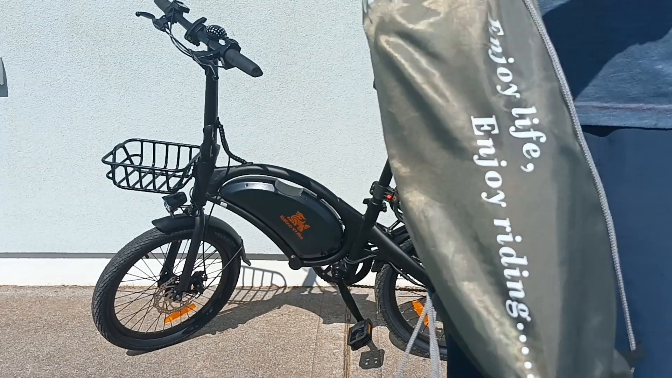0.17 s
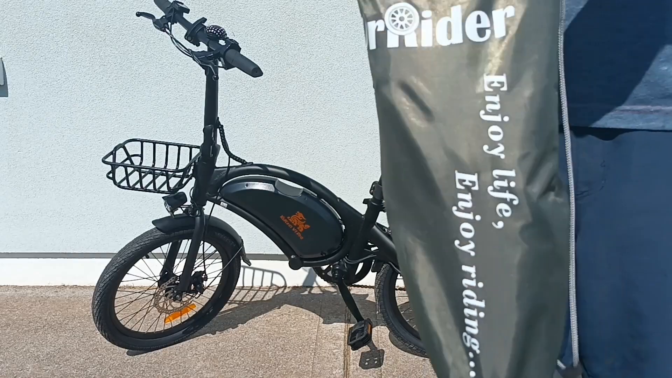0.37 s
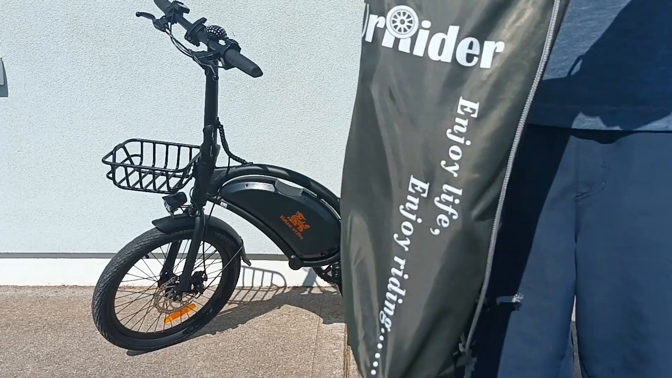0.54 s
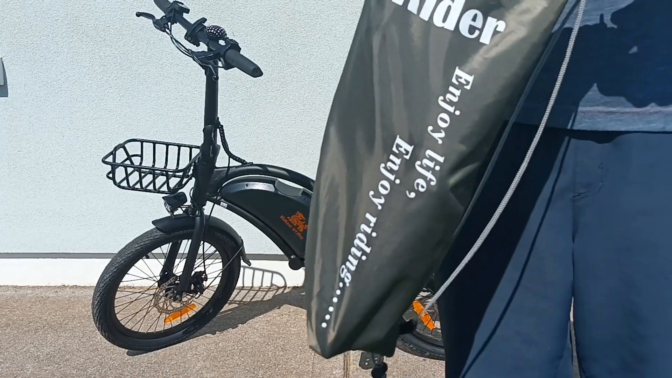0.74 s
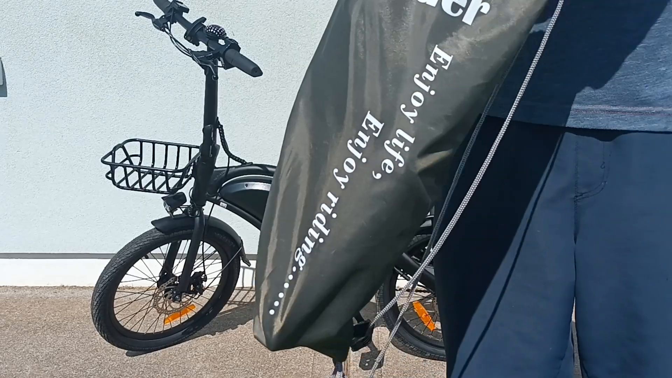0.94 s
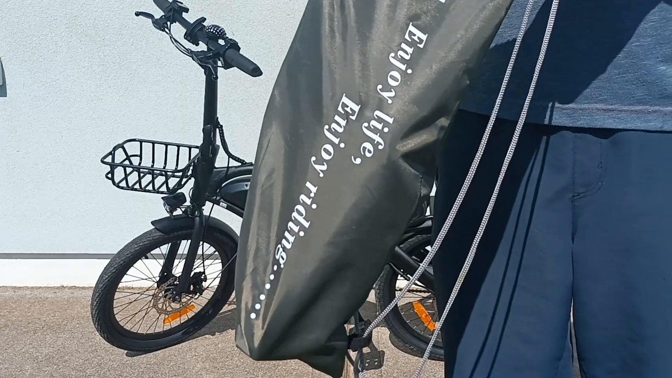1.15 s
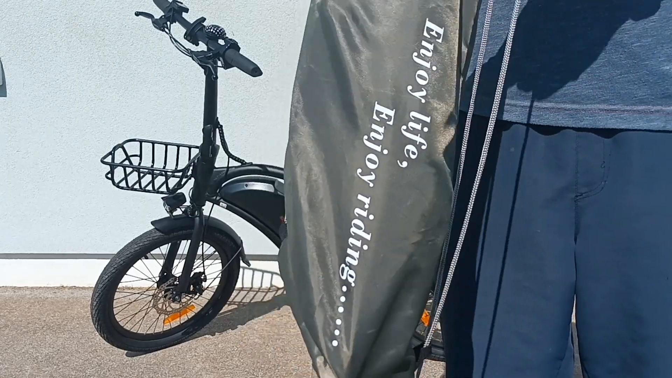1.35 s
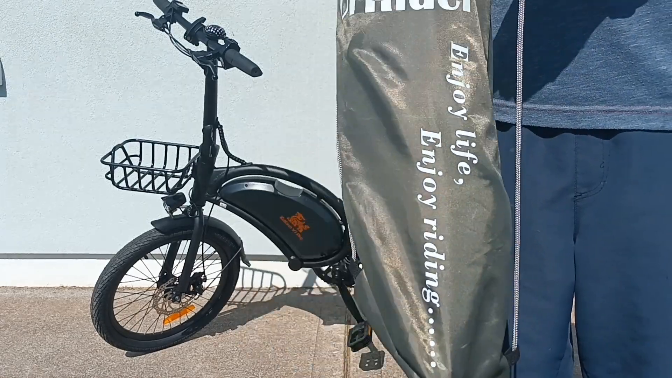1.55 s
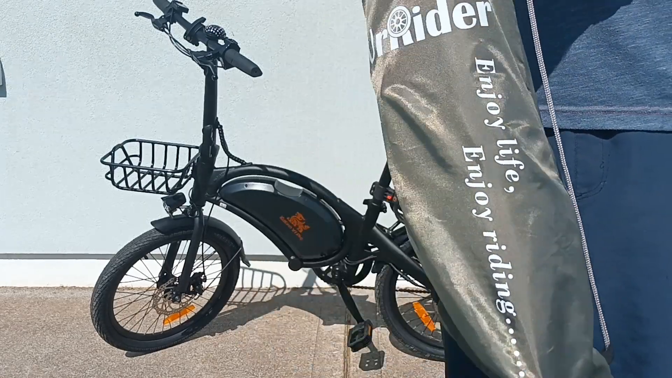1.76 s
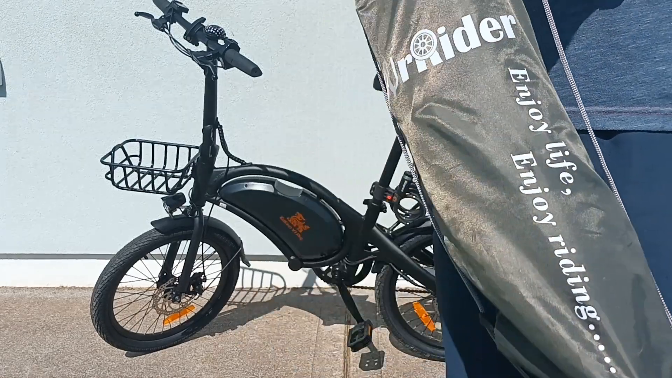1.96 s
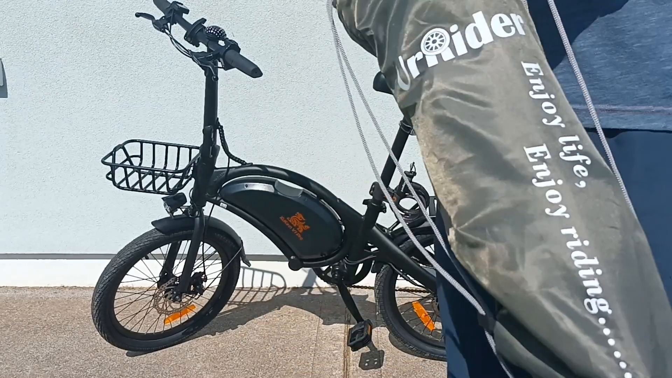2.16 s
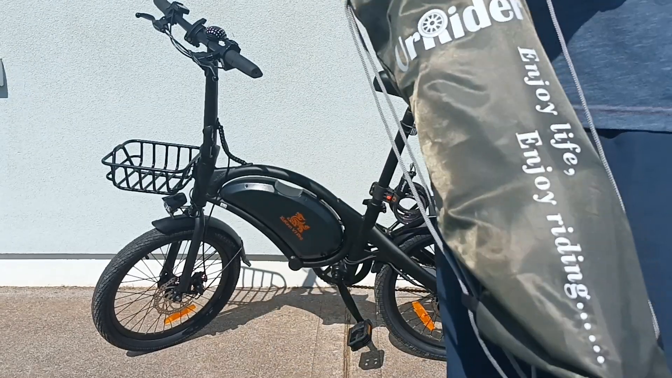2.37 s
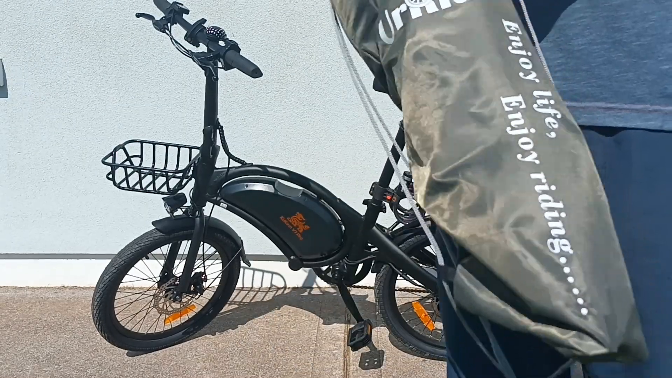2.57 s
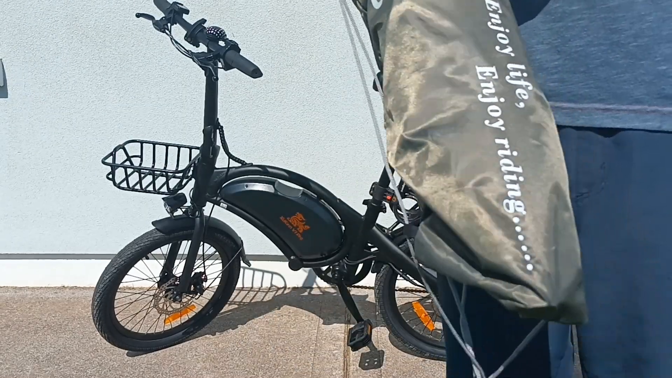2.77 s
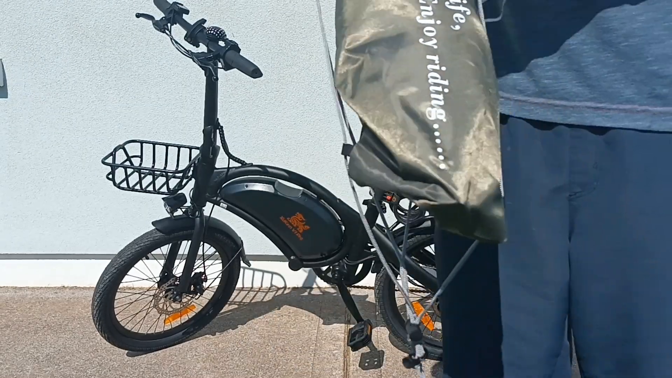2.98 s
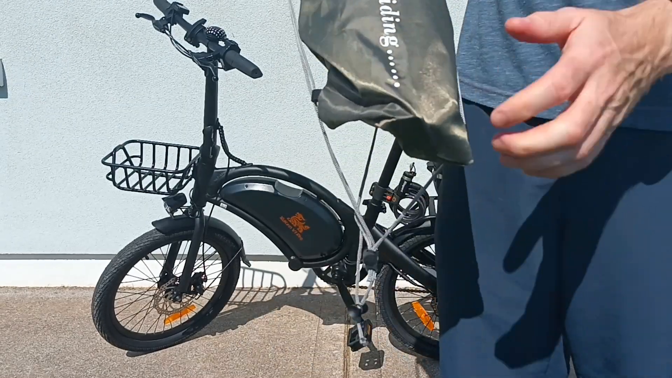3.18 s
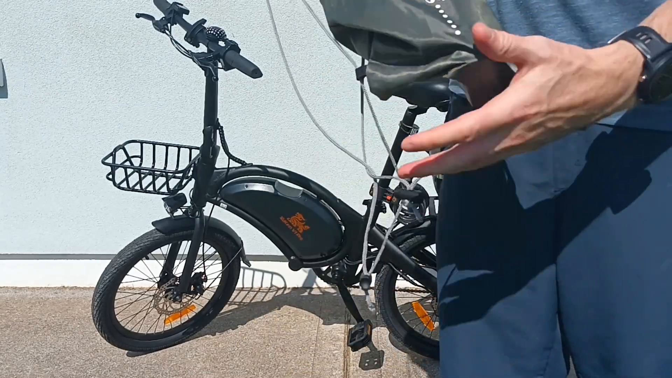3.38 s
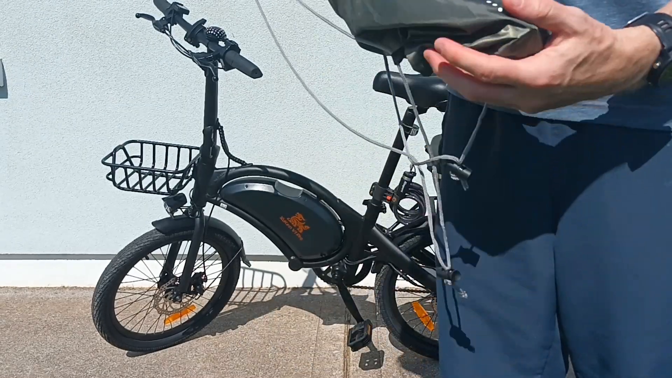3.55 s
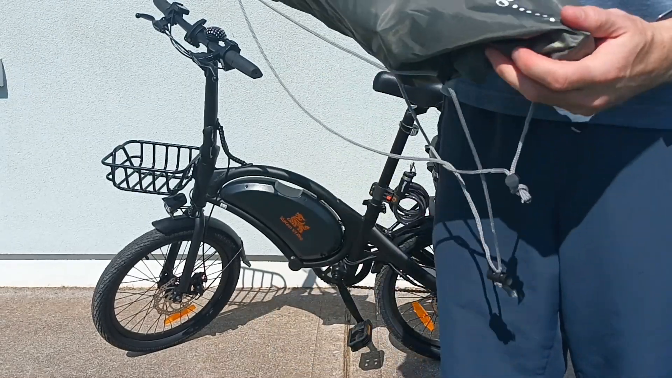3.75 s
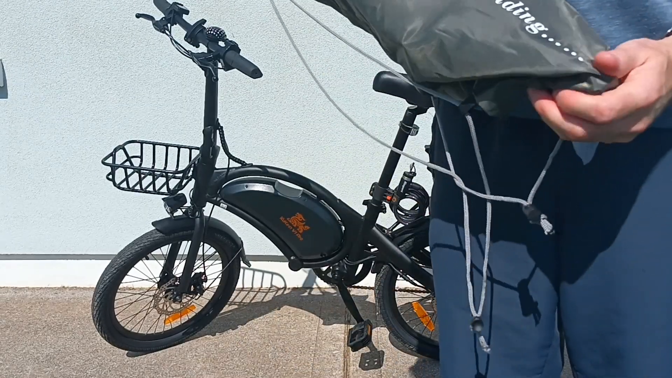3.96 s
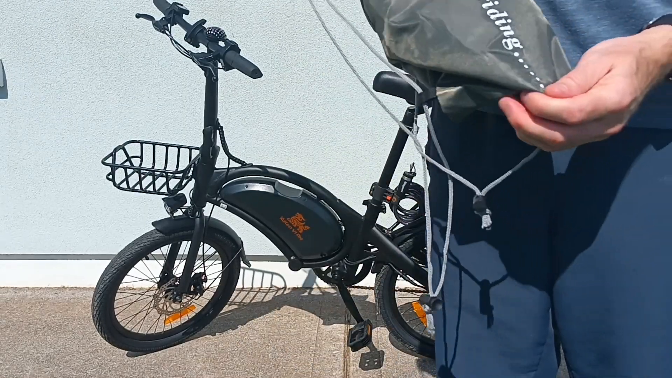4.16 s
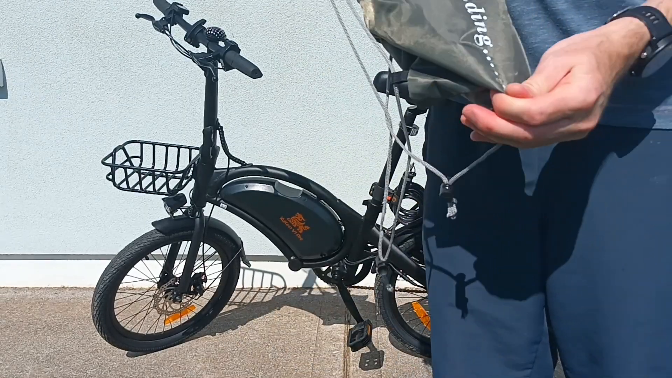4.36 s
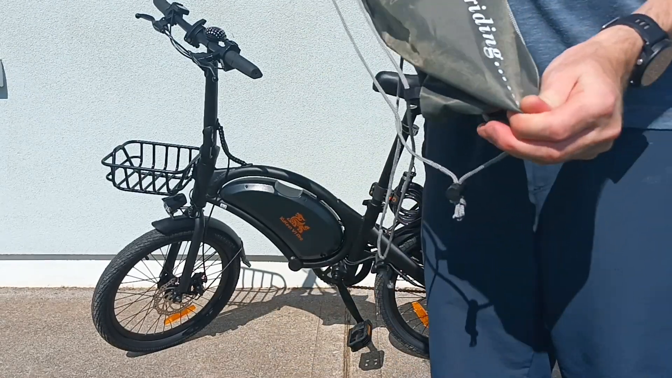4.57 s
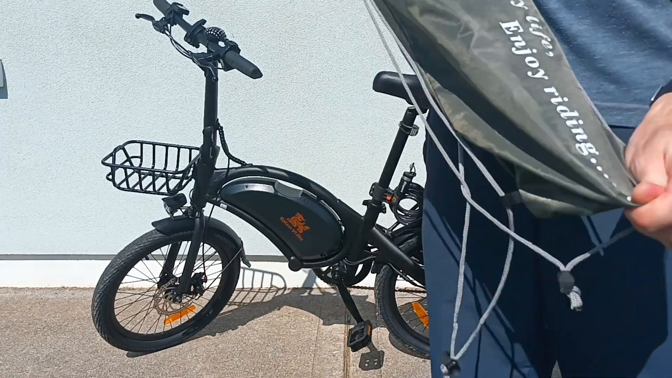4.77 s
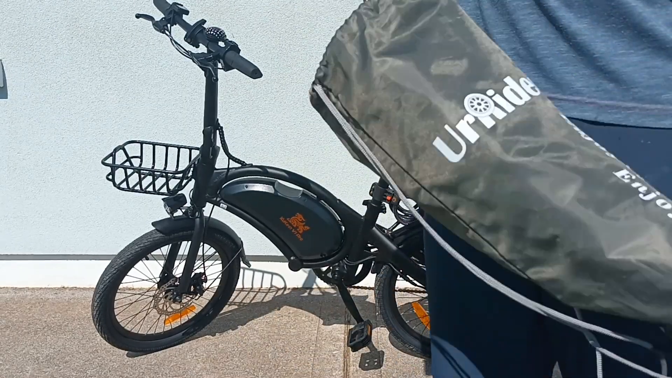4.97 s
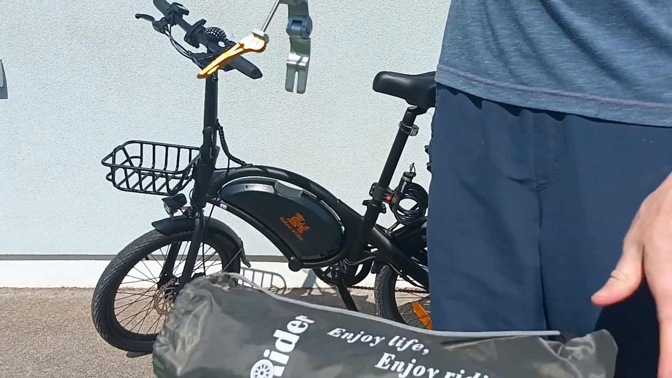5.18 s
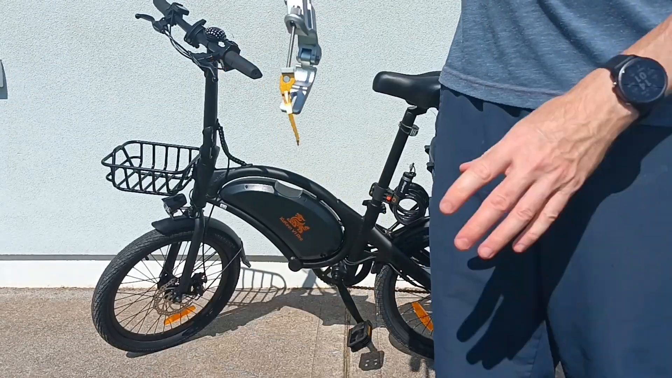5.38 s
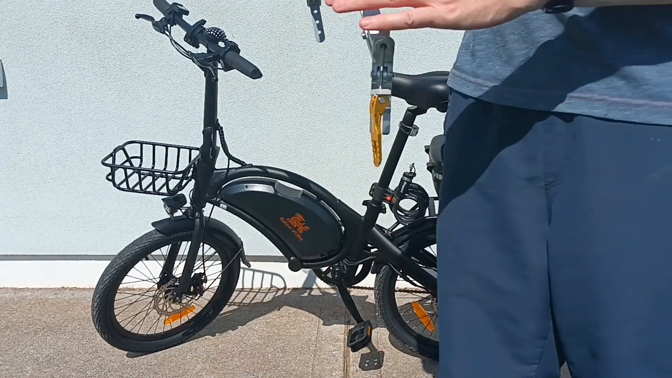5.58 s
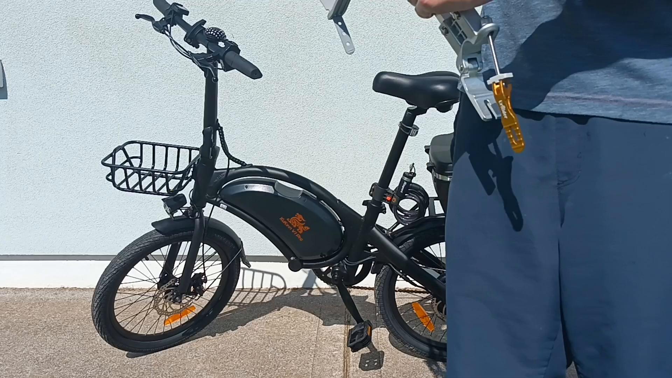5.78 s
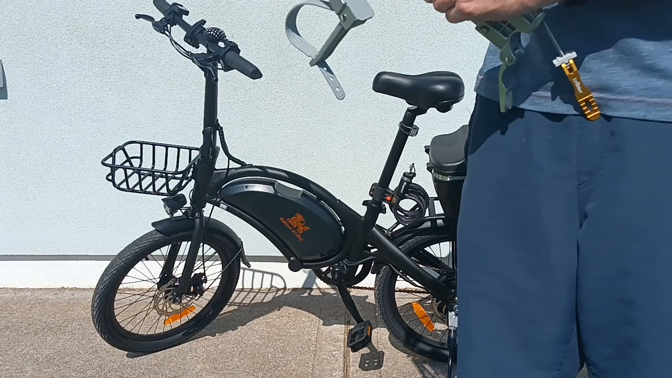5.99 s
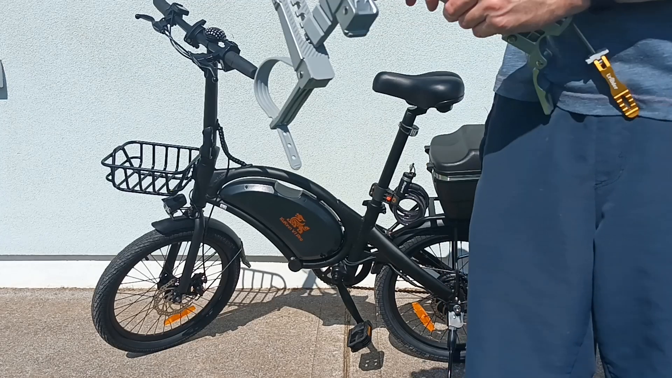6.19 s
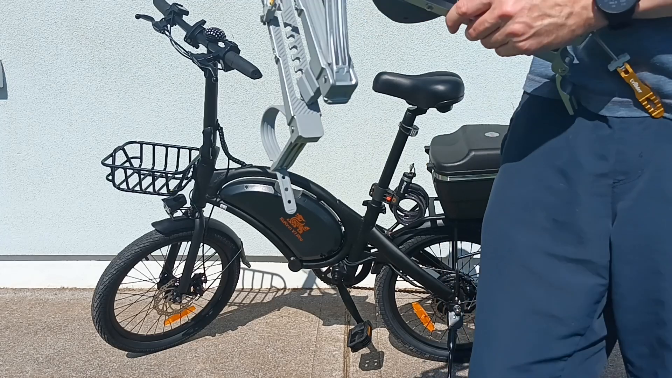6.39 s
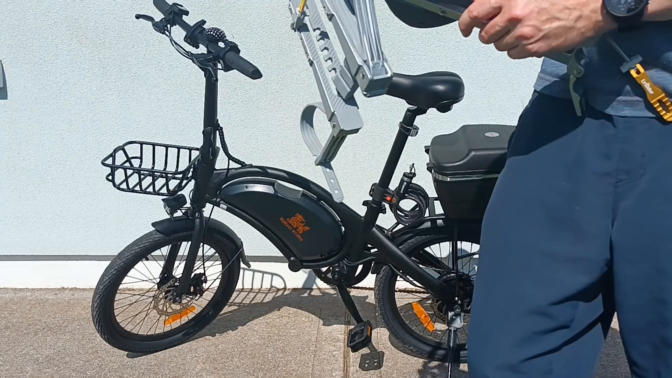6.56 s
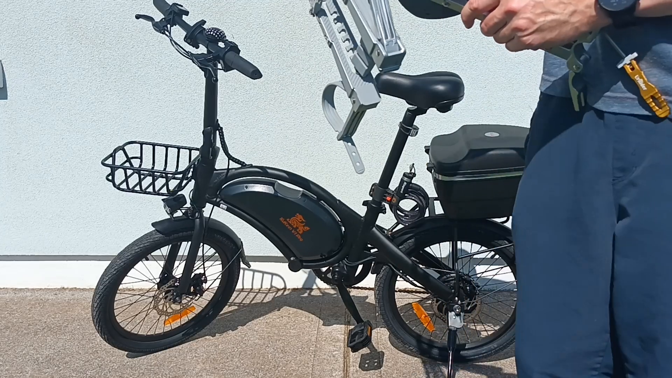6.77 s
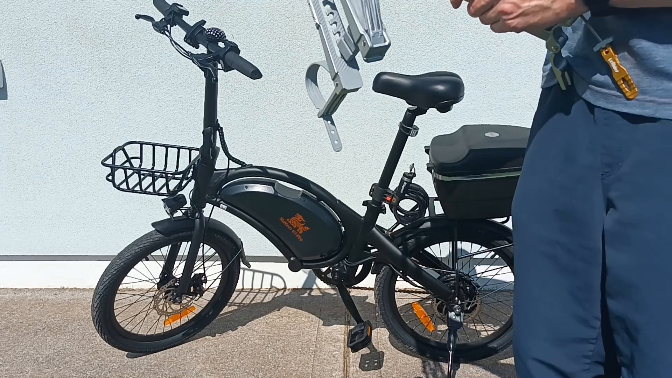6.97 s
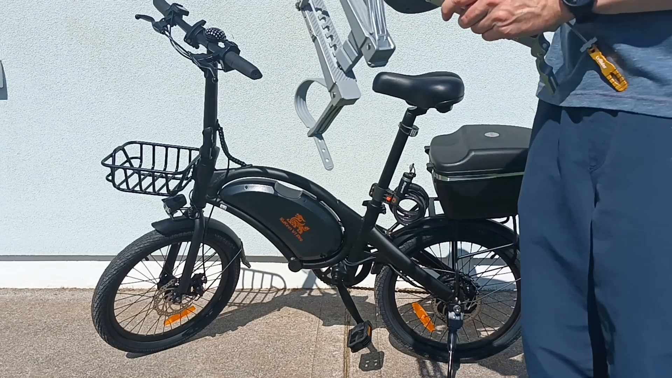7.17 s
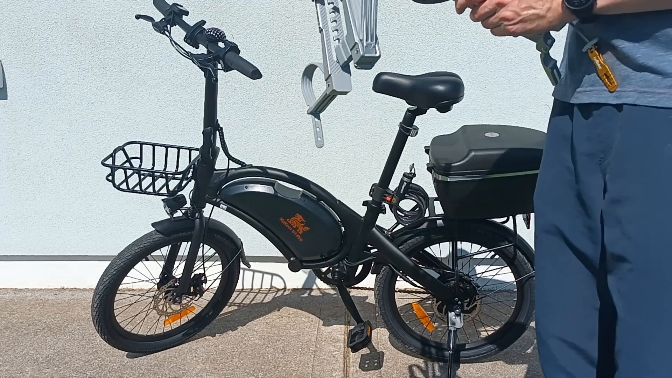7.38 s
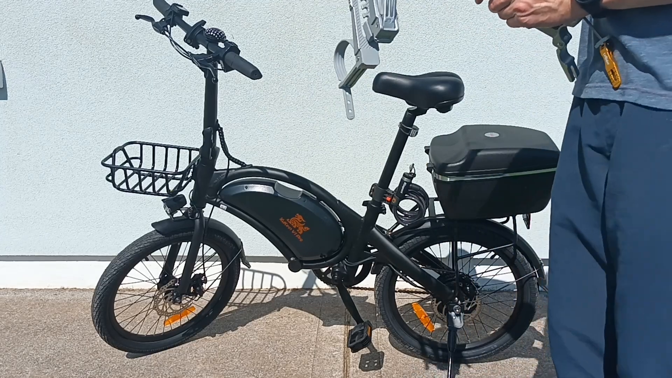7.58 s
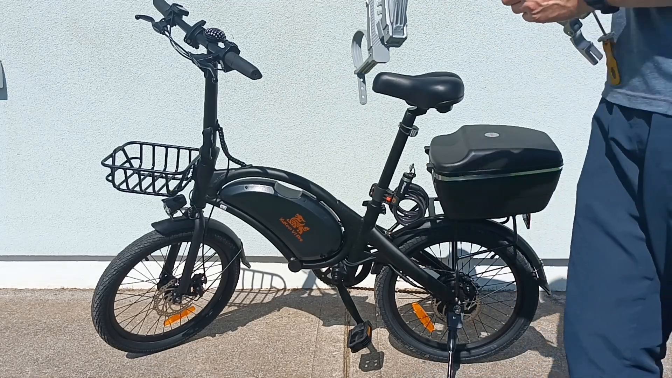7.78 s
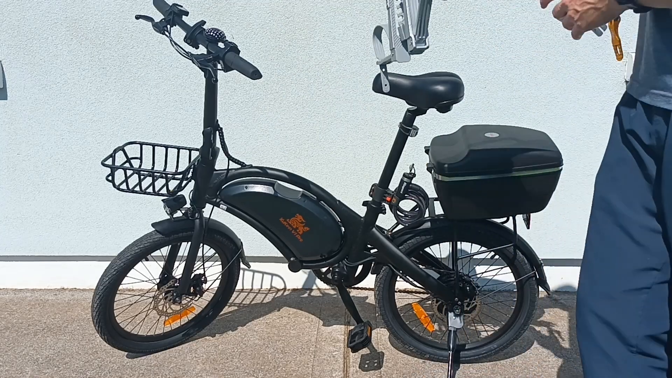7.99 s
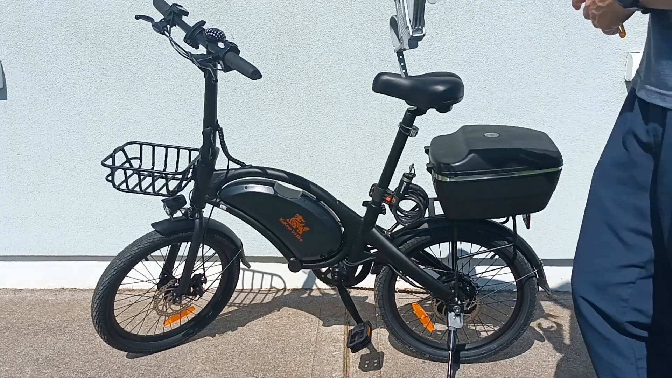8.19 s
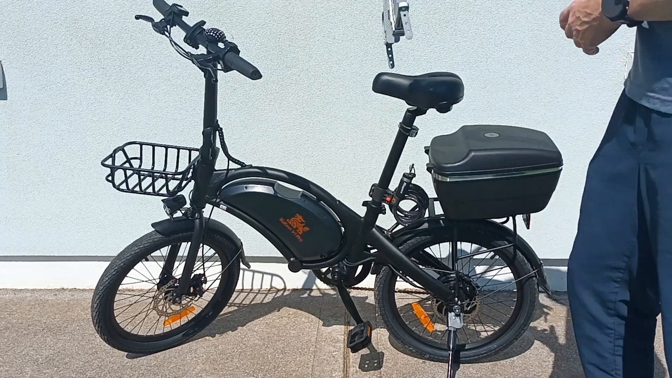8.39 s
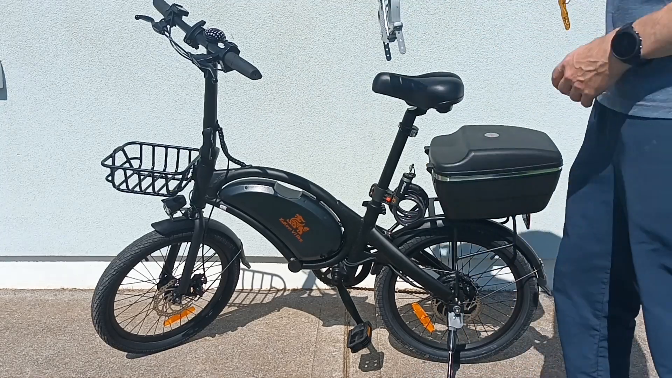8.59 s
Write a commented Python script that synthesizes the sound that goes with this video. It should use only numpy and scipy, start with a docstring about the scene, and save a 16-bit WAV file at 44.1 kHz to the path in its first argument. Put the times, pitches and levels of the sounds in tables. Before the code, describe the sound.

A quiet yard by a wall, with faint distant town noise and light wind. At 0 s a nylon bag swishes close by, snapping sharply at about 0.17 s, then crumples more softly. From 0.6 to 1.6 s a bird some way off whistles short gliding notes with echoes. Cloth strokes resume at 1.6-2.6 s, crisp and crackly with small pops, then lighter rustles from 3.2 to 4.2 s. A swelling pull from 4.3 s brings a hard snap at 4.47 s and a bright hiss to 4.7 s. Metal clacks and rings at 4.8-5.2 s, strongest near 4.9; the empty bag flops on paving at 5.3 s. Small clinks dot 5.6-6.3 s, with faint clothing rustle later. The bird sings again from 6.6 s, ending in swooping two-part syllables from 7.9 s. Two light clinks come near 8.2 s as wind bumps the microphone.

```python
"""Outdoors by a house wall, a nylon drawstring bag is pulled off a folded metal frame and dropped on the paving.
The cloth swishes, crumples and snaps: showers of tiny clicks are coloured, and folds crack and thud.
The frame's loose parts clack and ring: each knock drives resonances and leaves decaying tones.
A songbird sings two phrases some way off as gliding whistles with echoes.
Shaped noise makes distant town noise and light wind, whose strongest eddies bump the microphone."""
import sys
import numpy as np
from scipy import signal
from scipy.fft import rfft, irfft, next_fast_len
from scipy.io import wavfile

SR = 44100
rng = np.random.default_rng(int(sys.argv[2]) if len(sys.argv) > 2 else 0)


def wav_record(signal):
    """Record a signal, one row per channel, as 16-bit PCM in the file named by sys.argv[1]."""
    frames = np.transpose(np.atleast_2d(signal))
    bounded = np.clip(frames, -1, 1)
    # unit amplitude maps onto the largest positive 16-bit level
    quanta = np.round(bounded * 32767).astype(np.int16)
    wavfile.write(sys.argv[1], SR, quanta)


N = 380979  # length in samples


def from_db(db):
    """Turn decibels into gain: every 20 dB is a factor of ten."""
    return np.exp(np.asarray(db) * (np.log(10) / 20))


def rms_one(x):
    """Scale a sound so that its rms strength is 1."""
    return x / np.sqrt(np.mean(x ** 2) + 1e-20)


def left_right(difference_db):
    """Gains for two sides that differ by this many decibels, left minus right."""
    return from_db(difference_db * np.array([[0.5], [-0.5]]))


def per_bin(points):
    """Read a table at every FFT frequency, in straight lines over log frequency."""
    hz, value = np.transpose(points)
    bin_hz = np.fft.rfftfreq(next_fast_len(N), 1 / SR)
    return np.interp(np.log(bin_hz + 1), np.log(hz), value)


def drift(rate_hz):
    """Random wandering with spread 1: noise smoothed twice, so that changes faster than the rate fade."""
    step = 40  # samples from one computed point to the next
    settle = 2000  # points thrown away while the smoothing settles
    r = np.exp(-2 * step * np.pi * rate_hz / SR)
    noise = rng.standard_normal(N // step + settle + 2)
    slow = signal.lfilter([1], [1, -2 * r, r * r], noise)[settle:]
    return np.interp(np.arange(N) / step, np.arange(len(slow)), rms_one(slow))


def resonance(x, hz, width_hz):
    """A two-pole resonance favours one pitch, with gain 1 at its top."""
    r = np.exp(-np.pi * width_hz / SR)
    top_gain_one = np.array([1, 0, -1]) * (1 - r * r) / 2
    return signal.lfilter(top_gain_one, [1, -2 * r * np.cos(2 * np.pi * hz / SR), r * r], x + 1e-18)


def colour(pair, spectrum, likeness):
    """Turn two unrelated signals into left and right with a given spectrum and likeness; rms 1."""
    size = next_fast_len(N)
    mid, side = rfft(pair, size) * from_db(per_bin(spectrum))
    alike = np.clip(per_bin(likeness), 0, 1)
    mid = mid * np.sqrt(1 + alike)
    side = side * np.sqrt(1 - alike)
    return rms_one(irfft(np.array([mid + side, mid - side]), size)[:, :N])


def add(track, start_s, sound):
    """Mix a short sound into a track at a given time."""
    start = max(round(start_s * SR), 0)
    track[..., start:start + sound.shape[-1]] += sound[..., :N - start]


def burst(decay_s, apart):
    """A sharp tick and a dying cluster of tiny impacts, partly different on each side; height about 1."""
    t = np.arange(SR // 8) / SR
    shared, *separate = rng.standard_normal((3, len(t)))
    cluster = (shared + apart * np.array(separate)) / np.hypot(1, apart)
    tick = np.exp(-t / 0.0005) / 2
    return cluster * (np.exp(-t / decay_s) + tick) / 2


def yard(x, t60_s, build_s):
    """Scattered echoes from walls and trees, different on each side; they thicken, then die away."""
    t = np.arange(SR) / SR
    scatter = rng.standard_normal((2, SR)) * from_db(-60 * t / t60_s) * (1 - np.exp(-t / build_s))
    scatter /= np.sqrt(np.sum(scatter ** 2, axis=1, keepdims=True))
    return signal.fftconvolve(np.atleast_2d(x), scatter, axes=1)[:, :N]


def creases(per_s, spread_db):
    """Random clicks of widely differing size, arriving in clumps; rms 1."""
    chance = per_s * from_db(2.5 * drift(50)) / SR
    born = rng.random((2, N)) < chance
    sizes = from_db(spread_db * np.minimum(rng.exponential(1, (2, N)), 4))
    return rms_one(born * sizes * rng.choice([-1, 1], (2, N)))


def stroke(length_s, swell_db, attack_s, release_s):
    """One movement of cloth: it sets in, swells or sags while it lasts, then dies away."""
    t = np.arange(int((length_s + 10 * release_s) * SR)) / SR
    set_in = 1 - np.exp(-(t / attack_s) ** 2)
    swell = from_db(swell_db * (np.minimum(t / length_s, 1) - 0.5))
    die_away = np.exp(-np.maximum(t - length_s, 0) / release_s)
    return set_in * swell * die_away


# hollows of the bag that open and close as it bends: pitch_hz, width_hz
HOLLOWS = [(260, 150), (370, 170), (490, 65), (790, 300), (980, 112), (1210, 370), (2150, 570),
           (3300, 2360), (4600, 290)]


def flex(pair):
    """Cloth changes colour as it bends: each hollow booms for a moment, then closes; rms 1."""
    booms = 0
    for pitch_hz, width_hz in HOLLOWS:
        openness_db = -8.5 + 10.3 * np.clip(drift(9.6), -2, 2)
        booms = booms + resonance(pair, pitch_hz, width_hz) * from_db(openness_db)
    return rms_one(pair + booms)


# colour of the town noise: pitch_hz, relative level_db (per Hz)
AIR_SPECTRUM = [(20, -1.5), (60, -3), (130, -6.5), (350, -7), (600, -10.5), (1100, -15.5), (2000, -19),
                (4500, -22), (8000, -25.5), (11000, -27.5), (16000, -29.5)]
# how alike the two sides hear far-off noise: pitch_hz, likeness (0 to 1)
FAR_LIKENESS = [(50, 0.52), (300, 1), (900, 0.03), (15000, 0.015)]


def outdoors():
    """Distant town noise: steady random noise, coloured by a table."""
    return from_db(-59.5) * colour(rng.standard_normal((2, N)), AIR_SPECTRUM, FAR_LIKENESS)


# colour of the wind rumble: pitch_hz, relative level_db (per Hz)
GUST_SPECTRUM = [(15, -9.5), (35, 1.5), (70, -0.5), (120, -13), (200, -28), (400, -39), (1000, -44.5),
                 (16000, -100)]
# gusts on the microphone, before the shared rumble gain:
# peak_s, half_length_s, level_db, left_minus_right_db
GUSTS = [(0.088, 0.044, -35.5, 22), (0.195, 0.18, -46, 13), (0.448, 0.34, -55, 8), (1.334, 0.045, -52, 17),
         (1.892, .2, -55.5, -1), (2.728, 0.13, -46.5, 24), (3.33, 0.3, -46.5, 21), (4.0, 0.2, -56.5, 10),
         (4.525, 0.086, -49, 13.5), (7.226, 0.084, -51.5, -13), (7.765, .17, -49, 5),
         (8.044, 0.086, -41, -23), (8.348, 0.23, -36, 1.5)]
# single eddies hitting the microphone openings: peak_s, peak_db, width_s, left_minus_right_db
BUFFETS = [(0.08, -38, 0.0023, 25), (2.691, -44.5, 0.0024, 24), (2.773, -39, 0.0036, 29.5),
           (3.461, -42, 0.0029, 23), (8.009, -38.5, 0.0023, -25), (8.237, -30, .0017, -16.5),
           (8.286, -30, 0.0026, -6), (8.333, -26.5, 0.0019, -16), (8.366, -32.5, 0.002, -16),
           (8.493, -34.5, 0.0076, 15)]
BREEZE_DB = -66  # between the gusts, before the shared rumble gain


def wind():
    """Gusts swell over a light breeze: eddies rumble apart on each side, the strongest as pressure bumps."""
    t = np.arange(N) / SR
    power = from_db(BREEZE_DB) ** 2
    for peak_s, half_length_s, level_db, pan_db in GUSTS:
        level = from_db(level_db) * rms_one(left_right(pan_db))
        swell = np.exp(-2 * np.minimum(((t - peak_s) / half_length_s) ** 2, 20))
        power = power + level ** 2 * swell
    uneven_noise = rng.standard_normal((2, N)) * from_db(4.0 * drift(12.2))
    eddies = colour(uneven_noise, GUST_SPECTRUM, [(20, 0.16), (200, 0.46)])
    out = from_db(1.5) * np.sqrt(power) * eddies
    for peak_s, peak_db, width_s, pan_db in BUFFETS:
        u = np.arange(-SR // 20, SR // 20) / SR / width_s
        bump = (1 - u ** 2) * np.exp(-u ** 2 / 2)  # a push with a dip on either side
        add(out, peak_s - 1 / 20, from_db(peak_db) * left_right(pan_db) * bump)
    return out


# colour of the sliding weave, then of the buckling folds: pitch_hz, relative level_db (per Hz)
SWISH_SPECTRUM = [(300, -16), (1500, -19), (2500, -3), (4400, 0), (6500, 3.5), (8300, 3.5), (10500, 5),
                  (12500, -1), (16000, -7)]
CRUMPLE_SPECTRUM = [(60, 1), (200, -3), (380, 0), (560, 0), (850, -1), (1200, -0.5), (1600, -6), (2200, -6),
                    (3600, -9.5), (6000, -15), (16000, -40)]
# how alike the two sides hear the cloth: pitch_hz, likeness (0 to 1)
NEAR_LIKENESS = [(100, 0.64), (350, 0.88), (1100, 0.92), (1700, 0.22), (2400, 0.1), (3500, 0), (15000, 0)]
# strokes of cloth, first the bag over the frame, after its fall clothes and straps; before the shared gains:
# start_s, length_s, swish_db (mid-stroke), crumple_db (mid-stroke), swell_db (from start to end)
STROKES = [(0.0, .13, -49, -49.5, 10), (0.112, 0.06, -40.5, -42.5, 2), (0.183, 0.14, -58, -53.5, -7),
           (0.305, 0.088, -56, -49.5, -2), (0.43, 0.062, -59, -51, -2), (0.514, 0.36, -71.5, -64, -12.5),
           (0.793, 0.2, -59, -68, 11), (0.99, .036, -51.5, -63, -1), (1.056, 0.043, -76, -60.5, -7),
           (1.17, 0.056, -80, -59.5, -4), (1.39, 0.05, -57, -54.5, 3), (1.622, .05, -43.5, -53.5, -2),
           (1.673, 0.12, -48, -60.5, 0), (1.765, .11, -46.5, -55.5, 3.5), (1.897, 0.16, -53.5, -53.5, -8),
           (2.028, 0.11, -48.5, -53, -6), (2.18, 0.18, -54.5, -52.5, 4.5), (2.383, 0.034, -56, -46, 5),
           (2.436, .036, -52.5, -52.5, 7), (2.565, .016, -74, -45.5, -8), (2.663, 0.054, -56, -68, 9),
           (3.208, 0.035, -55, -82, -2), (3.289, 0.058, -53.5, -61, 2), (3.374, 0.13, -56.5, -57.5, -4),
           (3.486, 0.18, -63, -66.5, 13), (3.687, 0.17, -60, -61.5, 1.5), (3.839, 0.032, -48, -54, 2),
           (3.934, 0.091, -64.5, -63, 0), (4.055, 0.25, -60.5, -53, -6), (4.275, 0.245, -42.5, -44.5, 17),
           (4.523, 0.089, -41, -43.5, -3.5), (4.596, 0.11, -39, -48, -3), (4.778, .15, -61.5, -55, 5),
           (5.542, .38, -81, -64, 7.5), (6.274, .045, -69, -60.5, -5), (6.476, .04, -65, -72, 0),
           (7.105, 0.1, -60.5, -64.5, 7), (7.24, 0.18, -62.5, -66, 4.5), (7.69, 0.31, -69.5, -68.5, -11.5)]
# faint stirring under the strokes, before the shared gains
STIR_UNTIL_S, STIR_SWISH_DB, STIR_CRUMPLE_DB = 5.5, -82, -74


def nylon():
    """The weave hisses as it slides, larger folds buckle with a lower crackle; both catch and slip together."""
    stirring = np.arange(N) < STIR_UNTIL_S * SR
    power = from_db([[STIR_SWISH_DB], [STIR_CRUMPLE_DB]]) ** 2 * stirring
    for start_s, length_s, swish_db, crumple_db, swell_db in STROKES:
        shape = stroke(length_s, swell_db, attack_s=0.014, release_s=0.021)
        add(power, start_s, (from_db([[swish_db], [crumple_db]]) * shape) ** 2)
    swish, crumple = np.sqrt(power)
    slip = from_db(0.81 * drift(50))
    fibres = flex(colour(creases(per_s=7000, spread_db=1.0), SWISH_SPECTRUM, NEAR_LIKENESS))
    folds = flex(colour(creases(per_s=1000, spread_db=2.5), CRUMPLE_SPECTRUM, NEAR_LIKENESS))
    return slip * (from_db(1) * swish * fibres + from_db(5.0) * crumple * folds)


# taut folds popping over, before the shared gains: start_s, peak_db, thud_db (relative to the crack)
SNAPS = [(0.1630, -15, -22), (0.1718, -12, 2), (0.302, -32, 3), (0.325, -30, 1), (1.419, -39, -5),
         (1.632, -33, -6), (2.398, -41, 4), (2.416, -35, 3), (2.468, -33, -1), (2.567, -41, 15),
         (3.318, -41, -2), (3.422, -34, 1), (3.484, -37, 4), (3.872, -36, -8), (4.077, -36, 5),
         (4.099, -28, 3), (4.4735, -12.5, -6), (5.354, -40, 24)]
SNAP_DECAY_S = 0.0019  # how fast a snap dies


def snaps():
    """A fold cracks over and sets the stretched panel thudding in three resonances."""
    crack, push = np.zeros((2, 2, N))
    for start_s, peak_db, thud_db in SNAPS:
        add(crack, start_s, from_db(peak_db) * burst(SNAP_DECAY_S, apart=0.6))
        add(push, start_s, from_db(peak_db + thud_db) * burst(SNAP_DECAY_S, apart=0.22))
    panel = 3 * resonance(push, 270, 120)
    panel = panel - 2.4 * resonance(push, 950, 500)
    panel = panel + 0.8 * resonance(push, 1900, 600)
    return from_db(-2) * crack + panel


def whistle(start_s, pitch_hz, quaver):
    """A pure tone follows a pitch curve with a slight quaver, rounded at both ends."""
    rounded = np.sqrt(np.abs(np.sin(np.linspace(0, np.pi, len(pitch_hz)))))
    wavering_hz = pitch_hz * quaver[round(start_s * SR):][:len(pitch_hz)]
    return rounded * np.sin(2 * np.pi * np.cumsum(wavering_hz) / SR)


# short slurred bird notes, before the song's gains:
# start_s, length_s, pitch_hz (mid-note), glide_octaves (from start to end), level_db
NOTES = [(0.58, .035, 3020, 0, -59.5), (0.631, 0.066, 4446, 0.2, -53.5), (0.723, 0.078, 3650, .62, -58.5),
         (0.771, 0.031, 4420, .06, -51.5), (0.823, .3, 3715, 0.088, -62.5), (1.06, 0.042, 4120, .04, -66),
         (1.237, .04, 6100, .4, -60), (1.29, .025, 4420, -0.32, -56.5), (1.356, 0.078, 4280, -0.067, -60),
         (1.475, 0.031, 6090, 0.37, -55.5), (1.532, .02, 7570, 0.11, -50), (1.582, 0.023, 7420, 0.06, -47),
         (6.645, 0.07, 6030, -.1, -60.5), (6.784, 0.026, 6380, 0.27, -59), (6.823, 0.053, 5890, 0, -53),
         (6.99, .09, 5050, 0.041, -54.5), (7.15, .037, 4970, -0.26, -52.5),
         (7.289, 0.066, 4736, -0.17, -48.5), (7.405, 0.018, 4800, -.11, -49.5),
         (7.444, .02, 3990, -0.22, -45.5), (7.545, 0.056, 4180, -0.073, -50.5),
         (7.894, 0.013, 4950, 0.049, -43), (8.06, .012, 5120, 0.2, -50)]
# two-part syllables that close the song, before the song's gains:
# lead_s, lead_pitch_hz, lead_db, crest_s, crest_pitch_hz, crest_db
FLOURISH = [(7.853, 4280, -49.5, 7.921, 4630, -44.5), (8.022, 3694, -49, 8.052, 4690, -44),
            (8.203, 3650, -45.5, 8.26, 4125, -44), (8.403, 3530, -45, 8.46, 3680, -43)]
LEAD_S, SCOOP_OCTAVES, SCOOP_S = 0.05, 0.31, 0.00884  # the lead scoops up to its pitch
# the crest holds for half its length, then plunges and fades
CREST_S, PLUNGE_OCTAVES, PLUNGE_LOSS_DB = 0.046, 0.57, 12


def bird():
    """Near-pure whistles: slurred notes, then a flourish of two-part syllables, trailed by echoes."""
    song = np.zeros(N)
    quaver = 1 + 0.0228 * drift(280)
    for start_s, length_s, pitch_hz, glide_octaves, level_db in NOTES:
        bend = glide_octaves * np.linspace(-0.5, 0.5, round(length_s * SR))
        add(song, start_s, from_db(level_db) * whistle(start_s, pitch_hz * 2 ** bend, quaver))
    scoop = SCOOP_OCTAVES * np.exp(-np.arange(round(LEAD_S * SR)) / SR / SCOOP_S)
    plunge = np.maximum(np.linspace(-1, 1, round(CREST_S * SR)), 0)
    for lead_s, lead_hz, lead_db, crest_s, crest_hz, crest_db in FLOURISH:
        add(song, lead_s, from_db(lead_db) * whistle(lead_s, lead_hz * 2 ** -scoop, quaver))
        falling_hz = crest_hz * 2 ** (-PLUNGE_OCTAVES * plunge)
        fading = from_db(crest_db - PLUNGE_LOSS_DB * plunge)
        add(song, crest_s, fading * whistle(crest_s, falling_hz, quaver))
    wall = from_db(-1.5) * yard(song, t60_s=0.071, build_s=0.0014)
    trees = from_db(-0.5) * yard(song, t60_s=0.52, build_s=0.011)
    return (from_db(-0.5) * song + wall + trees) * from_db([[2.5], [-3]])  # stronger on the left


def chink(rattle, count):
    """Every point of contact adds many short partials of its own to the rattle."""
    pitches_hz = np.geomspace(2100, 13000, count) * 2 ** rng.uniform(-0.05, 0.05, count)
    partials = sum(rng.choice([-1, 1]) * resonance(rattle, hz, width_hz=61) for hz in pitches_hz)
    return 0.7 * rattle + 0.79 * partials


# metal parts knocking, levels before the resonances and modes act:
# start_s, clack_db, ring_db, region_hz (where it rings most)
CLINKS = [(4.818, -56, -52, 1620), (4.838, -36.5, -49, 7500), (4.886, -34, -53, 3100),
          (4.894, -22.5, -35, 3130), (4.92, -35, -46, 1580), (4.953, -62, -44, 4250),
          (4.954, -54, -52, 8450), (5.131, -45, -54, 3830), (5.168, -45, -50.5, 7400),
          (5.171, -56, -54, 11700), (5.576, -47, -64, 6100), (5.617, -47, -53, 2300),
          (5.654, -53, -51, 4900), (5.674, -36.5, -57, 9400), (5.752, -34.5, -54, 11600),
          (5.804, -41, -59, 6100), (5.832, -33.5, -46.5, 9600), (5.902, -36.5, -58, 5400),
          (6.122, -42, -61, 10700), (6.298, -47, -45, 3100), (8.127, -38, -65, 8800),
          (8.224, -38, -52, 7100), (8.233, -27, -55, 9500)]
# ringing modes of the frame's fittings: pitch_hz, relative level_db, t60_s (time to fall 60 dB)
METAL_MODES = [(1560, -4, .35), (2299, -3, .12), (3117, -3, .07), (4247, 3, .15), (4950, -2, .06),
               (6130, -3, .2), (6928, -2, .22), (7350, 0, .05), (8640, -2, .12), (9469, 2, .42),
               (10560, -4, .05), (11950, -1, .2), (12730, -4, .25)]
# broad resonances of the folded frame, before a shared gain: pitch_hz, width_hz, level_db
FRAME_RESONANCES = [(880, 560, -14), (1850, 1050, -3.5), (2990, 290, 0.5), (3940, 280, 2),
                    (5730, 1750, -2.5), (7670, 3560, -0.5), (9400, 3500, 0), (12500, 4100, -8.5)]
# a knock at the medium level rattles this long; the length doubles for every so many dB more
RATTLE_S, MEDIUM_KNOCK_DB, RATTLE_DOUBLES_DB = 0.0061, -37.5, 19


def frame():
    """Each knock rattles the folded frame and leaves fittings ringing; where it lands decides which modes sound."""
    knocks, rings = np.zeros((2, 2, N))
    t = np.arange(SR * 3 // 4) / SR
    mode_hz, mode_db, t60_s = np.transpose(METAL_MODES)[:, :, None]
    for start_s, clack_db, ring_db, region_hz in CLINKS:
        rattle_s = RATTLE_S * 2 ** ((clack_db - MEDIUM_KNOCK_DB) / RATTLE_DOUBLES_DB)
        add(knocks, start_s, from_db(clack_db) * chink(burst(rattle_s, apart=0.87), count=14))
        # modes lose 70 dB per octave away from the region, at most 32 dB
        loss_db = np.minimum(70 * np.abs(np.log2(mode_hz / region_hz)), 32)
        strength_db = ring_db + mode_db - loss_db
        phase = rng.uniform(0, 2 * np.pi, (len(mode_hz), 1))
        modes = from_db(strength_db - 60 * t / t60_s) * np.sin(2 * np.pi * mode_hz * t + phase)
        add(rings, start_s, modes.sum(axis=0) * (1 - np.exp(-t / 0.00016)))
    clacks = 0
    for k, (pitch_hz, width_hz, level_db) in enumerate(FRAME_RESONANCES):
        sign = (-1) ** k  # neighbours have opposite sign
        clacks = clacks + sign * from_db(level_db + 10) * resonance(knocks, pitch_hz, width_hz)
    return clacks + rings


# colour of the bag's landing: pitch_hz, relative level_db (per Hz)
FLOP_SPECTRUM = [(100, -14), (450, -17), (680, 2.5), (1100, -5), (1900, 1), (2600, -15), (3600, -11.5),
                 (6000, -15.5), (10000, -14), (16000, -24)]


def landing():
    """The empty bag crumples on the paving: one short shower of clicks that sags as it lasts."""
    level = np.zeros(N)
    shape = stroke(length_s=0.068, swell_db=-14, attack_s=0.032, release_s=0.02)
    add(level, 5.281, from_db(-30.5) * shape)
    return level * flex(colour(creases(per_s=2700, spread_db=2.5), FLOP_SPECTRUM, NEAR_LIKENESS))


def scene():
    """Cloth and metal close by, with a faint return from the yard; the bird, town noise and wind beyond."""
    cloth = nylon() + snaps() + landing()
    metal = frame()
    echoes = yard(from_db(-14.5) * cloth + from_db(-10.5) * metal, t60_s=0.24, build_s=0.0012)
    return cloth + metal + echoes + bird() + outdoors() + wind()


PORT_HZ, PORT_WIDTH_HZ = 10220, 1040  # resonance of the microphone openings
LEFT_LAG = 40  # samples
RIGHT_TOP_HZ, CUTOFF_HZ = 13300, 15900


def record(dry):
    """The openings resonate near 10 kHz, the left more; left is louder and slightly late, right duller."""
    port = np.array([[2.6], [0.4]]) * resonance(dry, PORT_HZ, PORT_WIDTH_HZ)
    left, right = dry * from_db([[1.2], [-1.2]]) + port
    left = np.pad(left, (LEFT_LAG, 0))[:N]
    right = signal.sosfilt(signal.butter(2, RIGHT_TOP_HZ, fs=SR, output="sos"), right)
    steep_lowpass = signal.ellip(10, 0.2, 70, CUTOFF_HZ, fs=SR, output="sos")
    return signal.sosfilt(steep_lowpass, np.array([left, right]))


dry = scene()
out = record(dry)
wav_record(out)
```